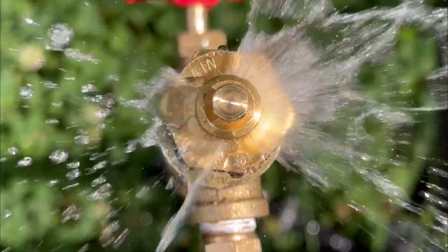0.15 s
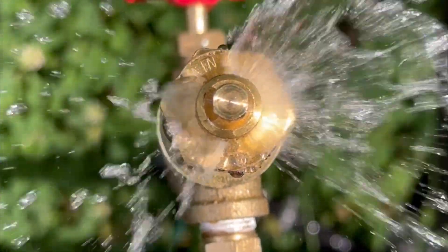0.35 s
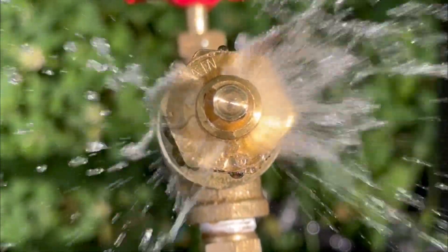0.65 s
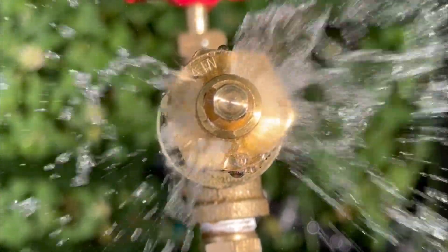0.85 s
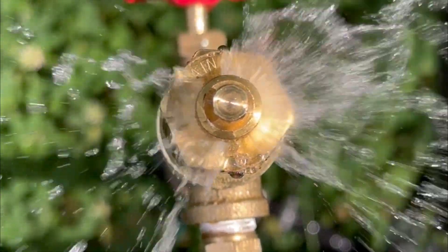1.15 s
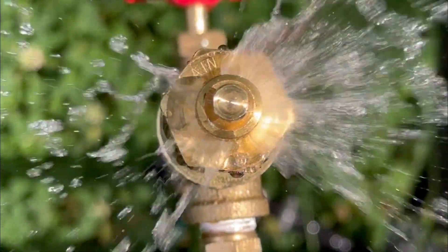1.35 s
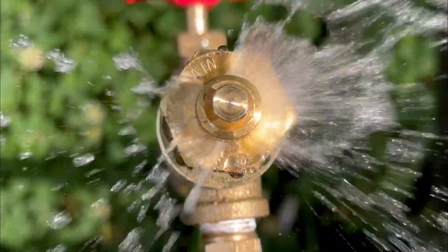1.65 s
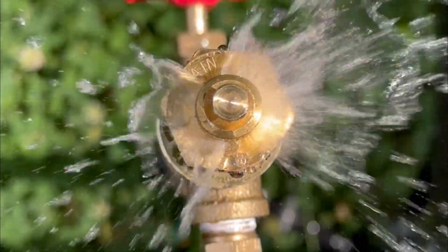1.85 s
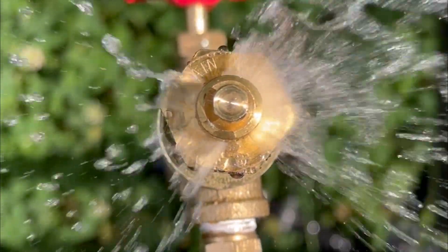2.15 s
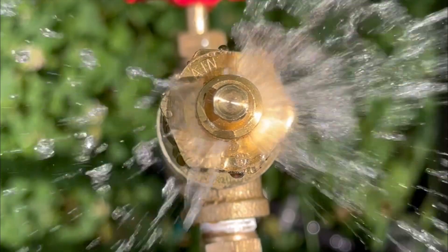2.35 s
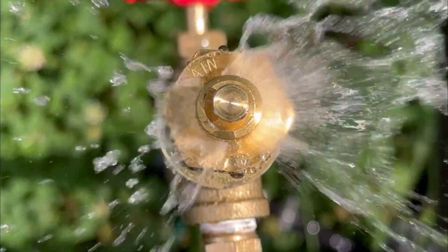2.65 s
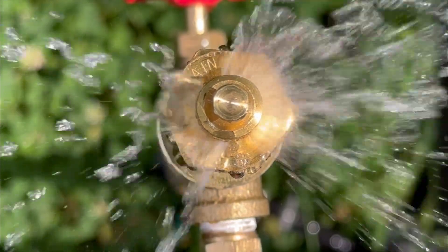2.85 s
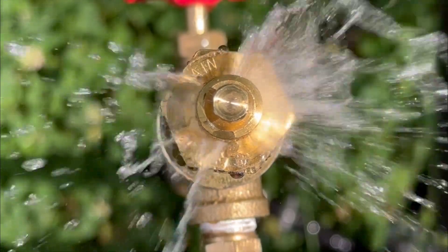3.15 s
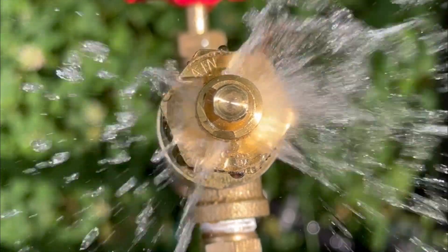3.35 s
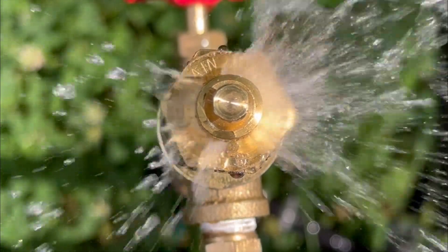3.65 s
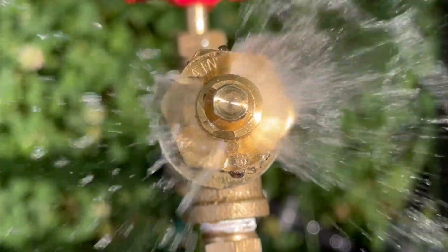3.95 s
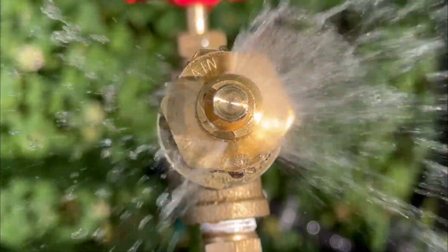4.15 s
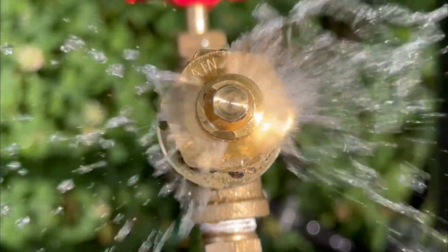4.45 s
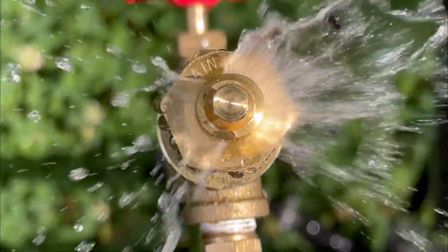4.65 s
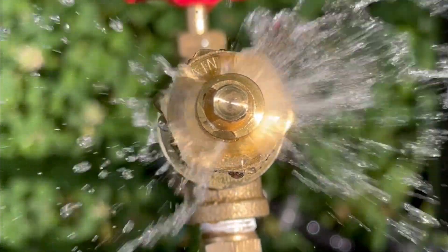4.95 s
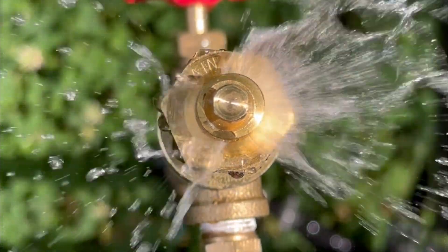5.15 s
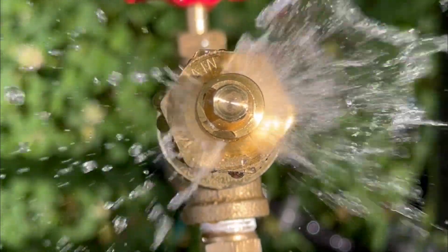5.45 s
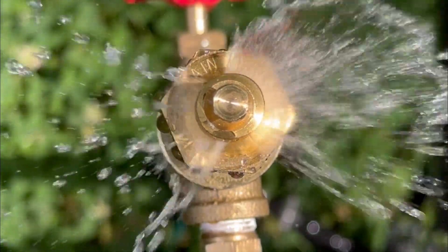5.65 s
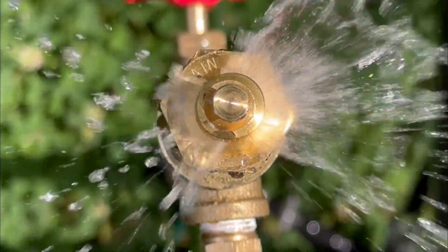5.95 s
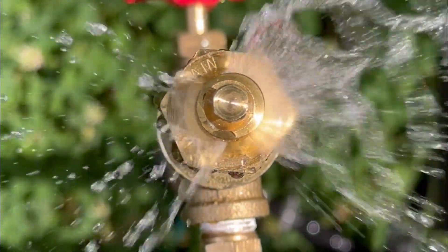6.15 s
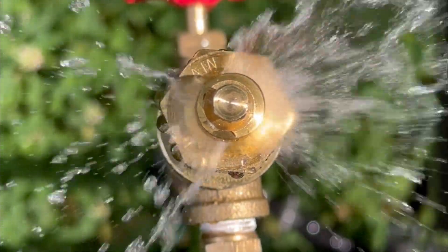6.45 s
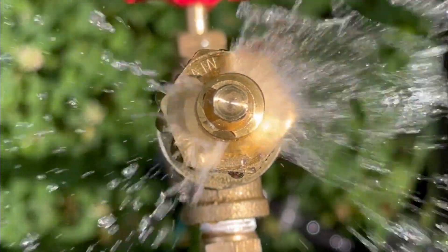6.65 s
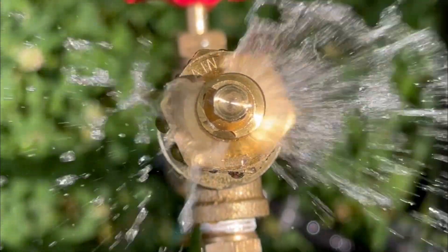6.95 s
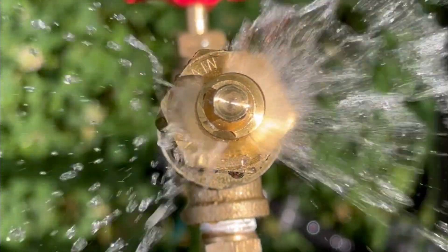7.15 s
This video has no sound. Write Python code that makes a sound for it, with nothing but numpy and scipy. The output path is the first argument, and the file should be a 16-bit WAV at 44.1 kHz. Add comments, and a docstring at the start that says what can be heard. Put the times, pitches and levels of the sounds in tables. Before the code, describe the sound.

From the start to the end, about 7.3 seconds, a sprinkler sprays close to the microphone outdoors: a loud, bright, steady hiss, mostly mid-high and airy, full of tiny droplet snaps, with a rapid uneven flutter of about 113 pulses a second that gives it a rough purr. At 0.4 s a heavy drop lands with a short hollow, sinking thud; much fainter wet plops come at 1.3 and 1.5 s. Around 2.0 to 2.1 s a tight cluster of drops ticks on a leaf, with tiny short rings and splatter. The spray holds even until about 3.6 s, eases by a few decibels and grows smoother between 3.9 and 4.4 s, then recovers by 4.5 s and continues unchanged, cutting off while running. Far underneath are a soft, swelling low rumble, a weak motor hum and a distant wavering low drone that comes and goes. Wide stereo, little echo.

```python
"""Garden sprinkler, close up

A brass sprinkler head throws a fan of water over plants: noise and random snaps, pulsed by a sheet
that flaps about 113 times a second; the spray eases once. A few heavy drops land as sinking thuds
and noise, or as short rings on a leaf. Behind: filtered-noise rumble, a motor's hum in two sines,
and a far drone in wavering sine swells."""
import sys
import numpy as np
from scipy import signal
from scipy.fft import rfft, irfft
from scipy.io import wavfile

SR = 44100
rng = np.random.default_rng(int(sys.argv[2]) if len(sys.argv) > 2 else 0)


def transcribe(u):
    """Save the signal u as a 16-bit wav file named by the first command-line argument.

    u: samples, shape (n,) or (channels, n), limited to [-1, 1]; the rate is SR.
    q: integer samples, one column per channel.
    """
    v = np.clip(np.atleast_2d(u).T, -1, 1)
    q = np.round(v * 32767).astype(np.int16)
    wavfile.write(sys.argv[1], SR, q)


N = 321048
TIME, HZ = np.arange(N) / SR, np.fft.rfftfreq(N, 1 / SR)


def gain_of(db):
    """Decibels to amplitude."""
    return 10 ** (np.asarray(db) / 20)


def evened(x):
    """Scales to rms 1."""
    return x / np.sqrt(np.mean(x ** 2) + 1e-20)


def read(points):
    """A (Hz, value) table at every FFT frequency, joined on a log axis."""
    f, value = np.transpose(points)
    return np.interp(np.log(HZ + 1), np.log(f + 1), value)


def follow(rows):
    """The columns of a time curve at every sample."""
    s, *columns = np.transpose(rows)
    return [np.interp(TIME, s, c) for c in columns]


def wander(rate_hz):
    """Random motion of rms 1, mostly slower than rate_hz, with no steady offset."""
    shape = HZ / (HZ + 2) / (1 + (HZ / rate_hz) ** 2)
    return evened(irfft(rfft(rng.standard_normal(N)) * shape, N))


def causal(gain):
    """Minimum-phase filter with this gain: it rings only after a click."""
    log_gain = np.log(np.maximum(gain, 1e-5))
    circle = np.concatenate([log_gain, log_gain[-2:0:-1]])
    return np.exp(np.conj(signal.hilbert(circle)))[:len(gain)]


# sound the two ports do not share: (frequency [Hz], level re shared sound [dB])
APART = [(110, -36), (200, -13), (380, -10.5), (720, -10.5), (1050, -34), (1600, -82), (6800, -59),
         (7700, -26), (8600, -14), (15500, -15)]
# phase lead of the left port: (frequency [Hz], lead [rad])
LEAD = [(7800, 0), (9200, 0.52), (15600, .92)]


def ports(a, b):
    """Two unrelated spectra become the partly alike signals of two microphone ports; mid rms 1."""
    apart = gain_of(read(APART)) * b
    turn = np.exp(.5j * read(LEAD))
    left, right = (a + apart) * turn, (a - apart) / turn
    pair = irfft(np.array([left, right]) / turn.real, N)
    return pair / np.std(pair.mean(0))


# rumble colour: (frequency [Hz], relative density [dB per Hz])
RUMBLE = [(15, -32), (26, -19), (36, -9), (50, -4), (72, 2), (95, 2.5), (120, -2.5), (165, -8.5),
          (280, -15.5), (400, -18), (700, -19.5), (2000, -50)]
# rumble swell: (time [s], level before trim [dB])
RUMBLE_DB = [(0.0, -52), (0.81, -50.5), (3.2, -55), (3.31, -50), (4.18, -56), (4.62, -52.5), (6.93, -52),
             (7.28, -54)]


def rumble(trim_db=0.86):
    """Low outdoor rumble: coloured noise that swells and sinks a little."""
    level_db, = follow(RUMBLE_DB)
    a, b = rfft(rng.standard_normal((2, N))) * gain_of(read(RUMBLE))
    return gain_of(level_db + trim_db) * ports(a, b)


# drone swells: (start [s], length [s], mean pitch [Hz], rms level at full swell [dB])
DRONE = [(0.3, 3.8, 139, -58.5), (4.25, 1.15, 140.5, -59), (6.2, 1.8, 138, -61.5)]
DRONE_FADE_S = .45  # rise and fall time


def drone(waver_hz=1.6):
    """Far drone: sine swells of wavering pitch; each rises, holds and recedes."""
    out, waver = np.zeros(N), waver_hz * wander(rate_hz=2.3)
    for start, length, hz, db in DRONE:
        edge_s = np.minimum(TIME - start, start + length - TIME)
        swell = np.clip(edge_s / DRONE_FADE_S, 0, 1)
        out += gain_of(db) * swell * np.sin(2 * np.pi * np.cumsum(hz + waver) / SR)
    return np.sqrt(2) * out


# motor partials: (frequency [Hz], rms level once risen [dB])
HUM = [(59.2, -60), (236.9, -62)]
HUM_START_DB, HUM_RISE_S = -16, .36  # start re final level; time constant


def hum(waver=0.095):
    """Motor hum: steady sines that come up and stay, each wavering in strength."""
    rise_db = HUM_START_DB * np.exp(-TIME / HUM_RISE_S)
    out = np.zeros(N)
    for hz, db in HUM:
        tone = np.sin(2 * np.pi * (hz * TIME + rng.random()))
        out += gain_of(db + rise_db) * tone * (1 + waver * wander(rate_hz=1.4))
    return np.sqrt(2) * out


# drops on a leaf: (time [s], initial level [dB], pitch [Hz], t60 [s])
TICKS = [(2.011, -32, 1410, .025), (2.028, -31, 1160, 0.013), (2.0533, -26.5, 1330, 0.014)]


def ticks():
    """A drop on a leaf: one quickly dying ring."""
    t, out = np.arange(SR // 20) / SR, np.zeros(N)
    for s, db, hz, t60 in TICKS:
        out[round(s * SR):][:len(t)] += gain_of(db - 60 * t / t60) * np.sin(2 * np.pi * hz * t)
    return out


# heavy drops: (time [s], contact peak [dB], starting pitch [Hz], length [s], splatter share [0-1])
PLOPS = [(0.408, -28, 530, 0.022, 0.21), (1.344, -42, 560, 0.022, 0.7), (1.504, -47, 360, 0.035, 0.6),
         (2.0525, -37, 525, 0.0062, 0.1), (2.062, -38.5, 520, 0.023, 0.77)]


def plops(knock_db=4, knock_hz=685, knock_decay=4.0, sink=2.5, splatter_hz=700):
    """A heavy drop: a brief hollow knock, a thud sinking in pitch as water spreads, and splatter."""
    t, out = np.arange(SR // 10) / SR, np.zeros(N)
    wet = signal.butter(3, [200, splatter_hz], "bandpass", fs=SR, output="sos")
    for s, db, hz, length, splatter in PLOPS:
        age = np.minimum(t / length, 1)
        thud = np.sin(2 * np.pi * np.cumsum(hz / (1 + sink * age)) / SR)
        knock = gain_of(knock_db) * np.exp(-knock_decay * age) * np.sin(2 * np.pi * knock_hz * t)
        splash = evened(signal.sosfilt(wet, rng.standard_normal(len(t)))) / np.sqrt(2)
        contact = gain_of(db) * np.sin(np.pi * age ** 0.55)  # quick to press, slower to let go
        drop = (1 - splatter) * (thud - knock) + splatter * splash
        out[round(s * SR):][:len(t)] += contact * drop
    return out


# jet strength, with one slow easing: (time [s], level before trim [dB])
JET = [(0.08, -30.5), (0.38, -31.5), (3.25, -31.5), (3.63, -31), (3.87, -34), (4.36, -35), (4.48, -32.5),
       (7.2, -32)]
FLAP_HZ, FLAP_DRIFT_HZ, FLAP_DEPTH = 112.9, 4, .33  # mean, rms drift, depth at full pressure
STALL_DB, STALL_RANGE_DB = -4.5, 3  # zero-flap point re median jet level; range up to full depth


def flapping():
    """Depth of the sheet's flapping: full under pressure, shallower when the jet slackens."""
    jet_db, = follow(JET)
    above_stall_db = jet_db - np.median(jet_db) - STALL_DB
    return FLAP_DEPTH * np.clip(above_stall_db / STALL_RANGE_DB, 0, 1)


def unrest(calm=.28):
    """How wildly the sheet tears, 1 on average: the hiss is smoother when flapping is shallower."""
    depth = flapping()
    return 1 - calm + calm * depth / depth.mean()


SPUTTER_DB, SPUTTER_HZ = 0.47, 9  # random sputter: rms at average unrest, rate


def tearing(flap_spread_hz=13, surge_db=0.75, burst_db=1.5):
    """Strength of the sheet's break-up: one uneven pulse a flap, plus turbulence."""
    rate_hz = FLAP_HZ + FLAP_DRIFT_HZ * wander(rate_hz=.8) + flap_spread_hz * wander(rate_hz=30)
    flap = np.exp(flapping() * np.cos(2 * np.pi * np.cumsum(rate_hz) / SR))
    turbulence_db = SPUTTER_DB * wander(rate_hz=SPUTTER_HZ)
    turbulence_db += surge_db * wander(rate_hz=18) + burst_db * wander(rate_hz=550)
    return evened(flap * gain_of(unrest() * turbulence_db))


def droplets(flow, per_s, spread_db):
    """Tiny snaps, more frequent where more water tears off; a few are large."""
    excess = np.minimum(rng.exponential(1, N), 4.5) - 1.5
    size = gain_of(spread_db * unrest() * excess)
    sign = rng.choice([-1., 1.], N)
    lands = rng.random(N) < flow ** 2 * per_s / SR
    return evened(size * sign * lands)


# hiss bands: (centre [Hz], own flicker [dB rms], droplet power share [0-1], flow exponent [-])
TEXTURE = [(1300, 0.95, 0.2, 0.74), (3070, 0.8, 0.28, 0.8), (5900, 1.0, 0.38, 0.92),
           (10200, 1.5, 0.28, 0.79), (14700, 1.5, 0, 0.68)]


def fizz(flow):
    """Spectrum of fine mist and droplets; each band flickers on its own, the top throbs least."""
    mist, snaps = flow * rng.standard_normal(N), droplets(flow, per_s=7000, spread_db=3.5)
    out = np.zeros(len(HZ), complex)
    for hz, flicker_db, share, throb in TEXTURE:
        band = read([(row[0], row[0] == hz) for row in TEXTURE])  # crossfades to its neighbours
        water = np.sqrt(1 - share) * mist + np.sqrt(share) * snaps
        water = water * flow ** (throb - 1)
        out += band * rfft(evened(water * gain_of(flicker_db * wander(rate_hz=180))))
    return out


# spray colour: (frequency [Hz], relative density [dB per Hz])
SPRAY = [(150, -27), (500, -16.6), (690, -10.7), (950, -7), (1170, -4.2), (1540, -1.8), (2100, -3.7),
         (2850, .7), (3450, -.1), (4500, -6), (5800, -2.2), (7000, -8), (8200, -6.9), (9500, -2.4),
         (10800, -1.8), (13200, -5.1), (15700, -5.1)]
# reflections from nearby surfaces: (delay [s], strength [amplitude ratio])
ECHOES = [(.00514, .045), (.00549, .04)]
RIPPLE = .17  # strength of the closest reflection from 14 kHz up


def spray(trim_db=1.19):
    """The tearing sheet and its reflections; the closest ripples only the top of the hiss."""
    flow = tearing()
    treble = np.clip((HZ - 7000) / 7000, 0, 1)
    paths = 1 - RIPPLE * treble * np.exp(-2j * np.pi * HZ * .001919)
    for delay_s, strength in ECHOES:
        paths = paths + strength * np.exp(-2j * np.pi * HZ * delay_s)
    colour = causal(gain_of(read(SPRAY))) * paths
    jet_db, = follow(JET)
    return gain_of(jet_db + trim_db) * ports(colour * fizz(flow), colour * fizz(flow))


def scene():
    """Spray and drops in front of the garden's low background."""
    return rumble() + drone() + hum() + ticks() + plops() + spray()


EDGE_HZ = 15760


def record(dry):
    """The recorder's band limit: a steep low-pass."""
    lowpass = signal.firwin(2047, EDGE_HZ, window=("kaiser", 9), fs=SR)
    return signal.oaconvolve(dry, lowpass[None], "same")


dry = scene()
out = record(dry)
transcribe(out)
```